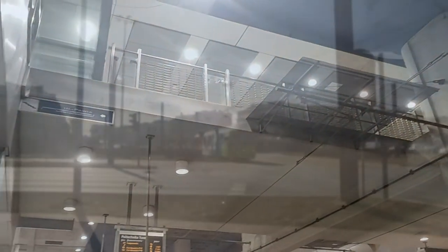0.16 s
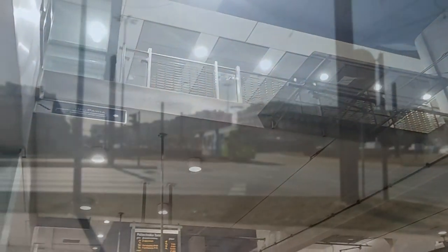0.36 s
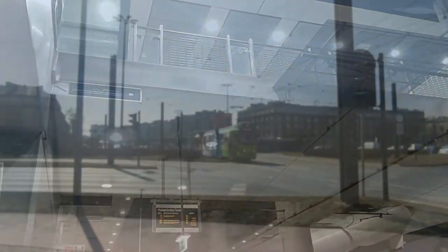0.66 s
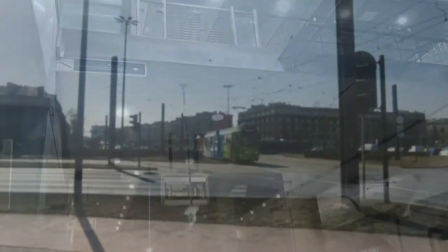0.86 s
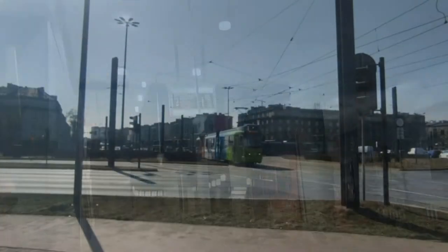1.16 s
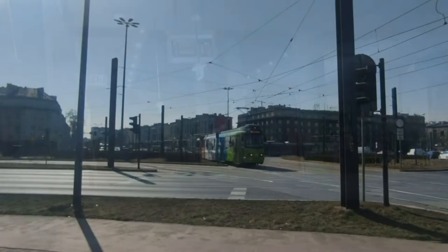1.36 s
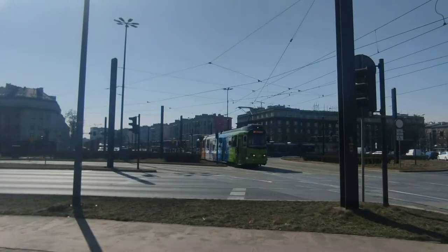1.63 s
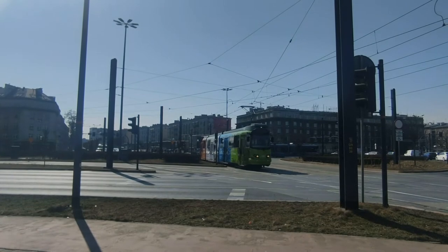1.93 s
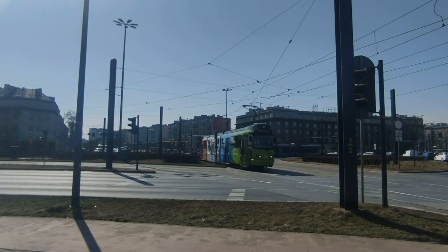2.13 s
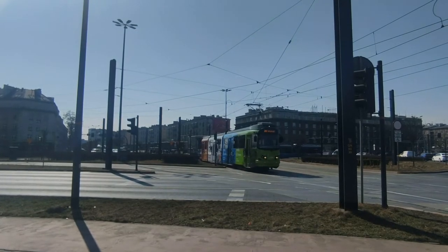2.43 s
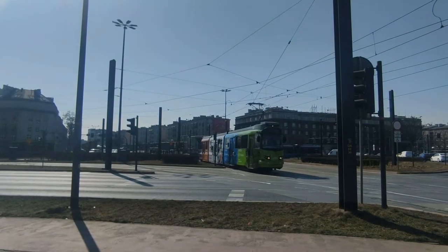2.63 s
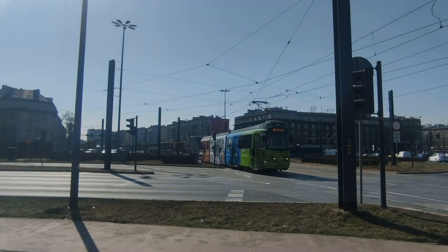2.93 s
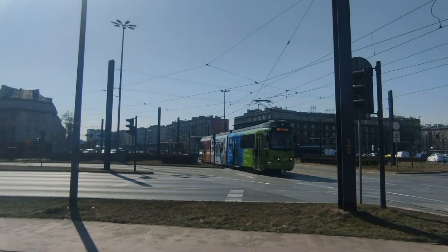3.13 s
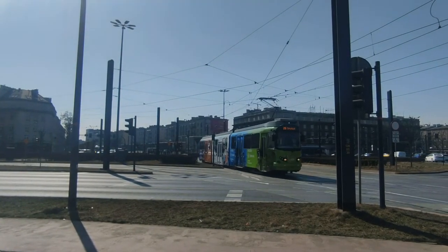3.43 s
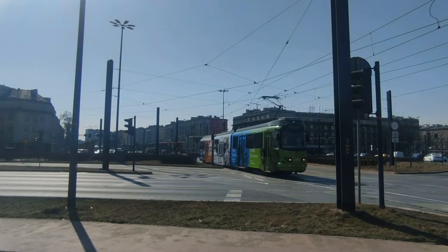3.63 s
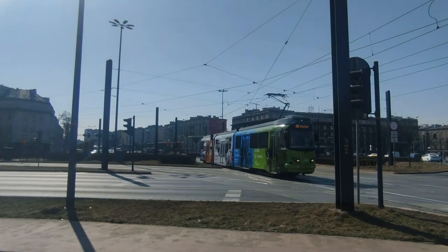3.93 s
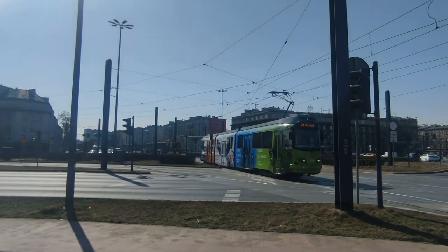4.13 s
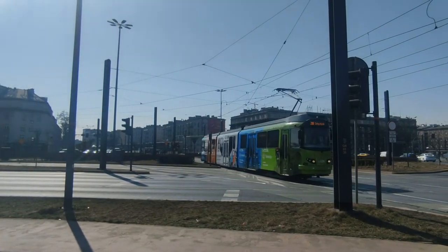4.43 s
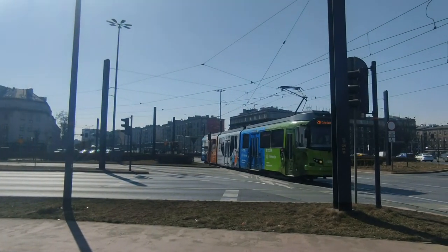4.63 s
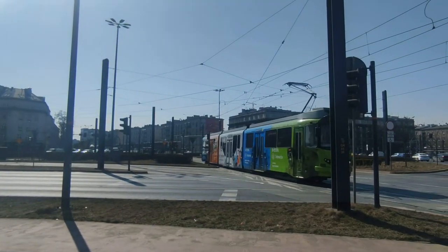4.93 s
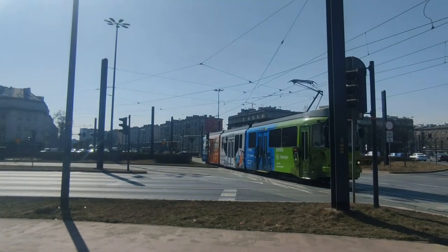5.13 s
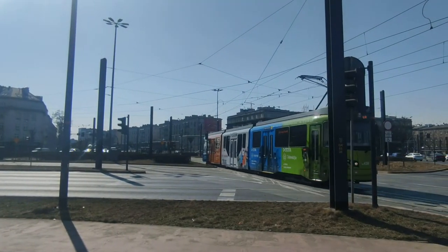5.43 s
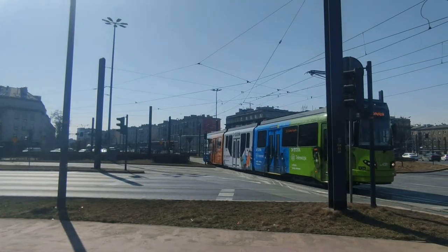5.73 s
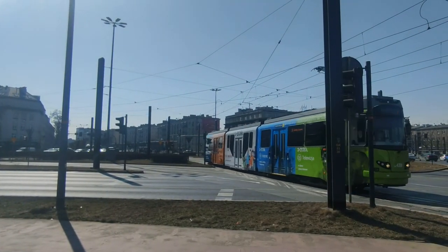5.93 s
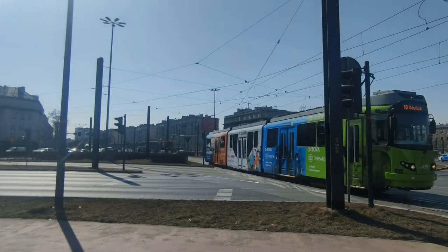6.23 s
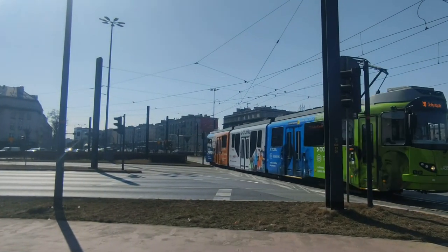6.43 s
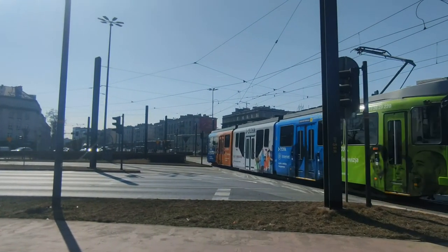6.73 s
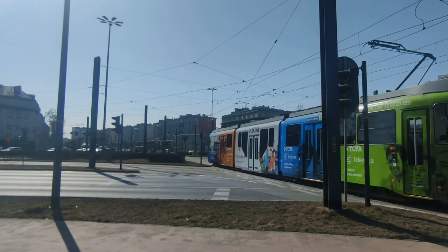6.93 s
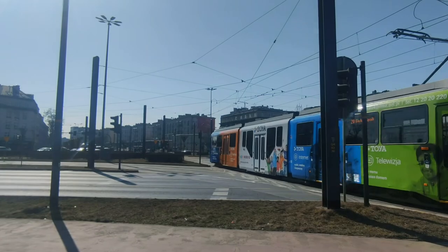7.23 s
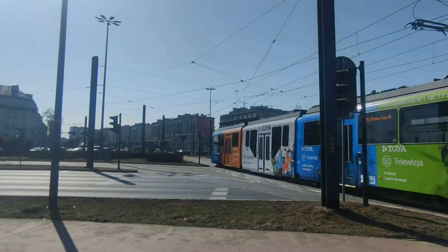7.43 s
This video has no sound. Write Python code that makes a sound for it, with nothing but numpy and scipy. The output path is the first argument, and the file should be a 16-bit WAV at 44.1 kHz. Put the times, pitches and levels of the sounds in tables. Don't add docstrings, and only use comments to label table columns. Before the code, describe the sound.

A booming station hall roar with dull knocks fades into a street tram approaching, rumbling, clattering over rail joints, ending with a close metallic bang.

```python
import sys
import numpy as np
from scipy import signal
from scipy.fft import rfft, irfft
from scipy.io import wavfile
from scipy.ndimage import uniform_filter1d

SR = 44100
rng = np.random.default_rng(int(sys.argv[2]) if len(sys.argv) > 2 else 0)


def dump_mix(stems):
    frames = np.atleast_2d(stems).T
    limited = np.clip(frames, -1, 1)
    pcm = np.round(limited * 32767).astype(np.int16)
    wavfile.write(sys.argv[1], SR, pcm)


def magnitude_from_level(level_db):
    exponent = np.asarray(level_db, float) / 20
    return 10 ** exponent


N = 334278


def evened(x):
    return x / np.sqrt(np.mean(x ** 2) + 1e-20)


def along(rows, t):
    s, *columns = np.transpose(rows)
    return [np.interp(t, s, c) for c in columns]


def add(mix, s, sound):
    part = mix[round(s * SR):][:len(sound)]
    part += sound[:len(part)]


def drift(size):
    smooth = uniform_filter1d(rng.standard_normal(N), size=size)
    return evened(uniform_filter1d(smooth, size=size))


def resonate(x, hz, width_hz):
    r = np.exp(-np.pi * width_hz / SR)
    if np.ndim(hz) == 0:
        pole = r * np.exp(2j * np.pi * hz / SR)
        return 2 * signal.lfilter([(1 - r) ** 2], [1, -2 * pole, pole * pole], x + 0j).real
    turn = np.exp(2j * np.pi * np.cumsum(hz) / SR)
    return 2 * (turn * signal.lfilter([(1 - r) ** 2], [1, -2 * r, r * r], x / turn)).real


def body(x, modes):
    return evened(sum((-1) ** k * magnitude_from_level(db) * resonate(x, hz, width)
                      for k, (hz, width, db) in enumerate(modes)))


def noise(colour, patchy_db, flicker_db, low_hz=1., high_hz=1e5, count=N):
    frames = count // 256 + 5
    real, imag, patches = rng.standard_normal((frames, 513, 3)).T
    patches = uniform_filter1d(patches, size=9, axis=1)
    patches = evened(uniform_filter1d(patches, size=6, axis=0))
    flicker = evened(uniform_filter1d(rng.standard_normal(frames), size=6))
    spectra = (real + 1j * imag) * magnitude_from_level(patchy_db * patches + flicker_db * flicker)
    x = signal.istft(spectra, nperseg=1024, noverlap=768)[1]
    hz = np.fft.rfftfreq(len(x), 1 / SR) + 1
    f, db = np.transpose(colour)
    tint = magnitude_from_level(np.interp(np.log(hz), np.log(f), db))
    band = 1 / np.sqrt((1 + (low_hz / hz) ** 8) * (1 + (hz / high_hz) ** 8))
    return evened(irfft(rfft(x) * tint * band, len(x))[:count])


def strike(rows, gain_db, t60):
    out, t = np.zeros(N), np.arange(round(SR / 5)) / SR
    for (s, db, hz), (a, b) in zip(rows, rng.random((len(rows), 2))):
        pair = np.sin(2 * np.pi * (hz * t + a)) + .7 * np.sin(2 * np.pi * (hz * 1.06 * t + b))
        add(out, s, magnitude_from_level(db + gain_db - 60 * t / t60) * (1 - np.exp(-t / 0.0018)) * pair)
    return out


# f/Hz, level/dB per Hz
HALL_COLOUR = [(12, -72), (20, -44), (53, -29), (81, -7), (260, -3.5), (407, -8.5), (563, -22), (778, -19),
               (1310, -43), (1770, -48.5), (4340, -68), (6310, -68), (7700, -79), (10000, -107),
               (16900, -120)]
# f/Hz, width/Hz, level/dB over the roar
HALL_MODES = [
    (89.2, 12, -7),
    (125, 14, -9),
    (153, 9.6, -8.5),
]
# f/Hz, width/Hz, level/dB
HALL_CLANK = [
    (754, 82, 3.5),
    (1020, 170, 0),
    (1300, 240, -4),
    (1650, 360, -17),
]


def hall(t):
    t = t[:2 * SR]
    fade = np.clip((1.6 - t) / 0.33, 0, 1)
    level_db = -19 - 9.5 * t - 31 * np.maximum(t - 1.01, 0)
    booms = sum(magnitude_from_level(db) * evened(resonate(rng.standard_normal(len(t)), hz, width))
                for hz, width, db in HALL_MODES)
    clank_db = -42.5 - 50 * np.maximum(t - 0.22, 0)
    clank = magnitude_from_level(clank_db) * body(rng.standard_normal(len(t)), HALL_CLANK)
    roar = noise(HALL_COLOUR, 0.9, 0.42, count=len(t)) + booms * np.clip((1.1 - t) / .5, 0, 1)
    return np.pad(clank + fade * magnitude_from_level(level_db) * roar, (0, N - len(t)))


# t/s, nearness level/dB, wheel scrub level/dB (flanges rub hardest on the
# bend), rail roar level/dB
TRAM = [(0.0, 6, -9, 0.5), (.35, -0.5, -10.5, 0), (.65, -0.5, -12.5, -1), (1.2, -3, -6.5, -1.5),
        (1.8, -6, -2.5, -0.5), (2.4, -5.5, -1.5, 0), (3.0, -4, 2, -1), (3.3, -3.5, 2, -0.5),
        (3.7, -3, 1.5, -0.5), (4.1, -1, -1.5, 0), (4.65, 1, -2, -0.5), (5.0, 1, -2, 0), (5.4, 2, -3, 0.5),
        (6.0, 1, -1, 0), (6.4, 2, -3.5, 0), (7.0, 2.5, -3.5, -0.5), (7.35, 4, -1.5, 0), (7.58, 8.5, -7, -1)]
# f/Hz, level/dB per Hz
ROLL_COLOUR = [(20, -43.5), (46, -6.5), (81, 3.5), (143, -7), (184, -6.5), (318, -10.5), (497, -19),
               (741, -16), (950, -21.5), (1150, -30.5), (1420, -24.5), (2050, -24.5), (2850, -36),
               (3600, -40), (4300, -45), (4850, -51), (5400, -46.5), (6150, -43.5), (7700, -47.5),
               (10000, -78)]
ROLL_EDGES = (128.4, 449, 1113, 2550)
# level/dB, share of nearness, of scrub, of rail roar [dB per dB]
ROLL_PARTS = [
    (-31, 0.93, 0.29, 0),
    (-29.5, 0.57, 0.054, 0),
    (-36.5, 0.98, 1.03, 0.99),
    (-41.5, 0.044, 1.09, 0),
    (-49.5, 0.11, 0.96, 0.32),
]


def rolling(t):
    edges = (1., *ROLL_EDGES, 1e5)
    unrest_db = ((1.4, 0.58), (1.25, 0.83), (1.6, 0.85), (1.2, 0.76), (1.7, 1.0))
    near_db, scrub_db, rail_db = along(TRAM, t)
    out = np.zeros(N)
    for k, (db, near, scrub, rail) in enumerate(ROLL_PARTS):
        level = magnitude_from_level(db + near * near_db + scrub * scrub_db + rail * rail_db)
        out += level * noise(ROLL_COLOUR, *unrest_db[k], edges[k], edges[k + 1])
    return out


def axle(t):
    db = -38.5 + 0.99 * along(TRAM, t)[0]
    return magnitude_from_level(db) * evened(resonate(rng.standard_normal(N), 86 + 2.3 * drift(size=6000), 33))


def ground(t):
    db = -38.5 + 1.2 * along(TRAM, t)[0]
    return magnitude_from_level(db) * evened(resonate(rng.standard_normal(N), 66, 30))


# t/s, peak level/dB, f/Hz
HALL_KNOCKS = [
    (0.357, -26, 647),
    (0.394, -24, 520),
    (0.644, -24, 511),
    (0.715, -27, 541),
    (0.794, -30, 697),
    (0.876, -21.5, 630),
    (1.242, -33.5, 686),
]


def hall_knocks():
    return strike(HALL_KNOCKS, -5, 0.052)


# t/s, peak level/dB, f/Hz, t60/s
THUMPS = [(1.407, -9.5, 84, 0.086), (1.539, -31, 78, 0.12), (2.67, -20, 84, 0.12), (4.23, -2, 83, 0.11),
          (4.928, -6, 92, 0.15), (6.349, -14, 99, 0.18), (6.456, -4, 80.7, 0.13),
          (6.512, -1.5, 71.6, 0.095), (6.997, -26, 165, 0.12), (1.04, -11, 129, 0.12),
          (1.27, -12.5, 120, 0.11), (1.73, -18, 63, .15), (2.6, -16, 66, 0.19), (6.391, -12, 63, 0.24),
          (6.92, -18, 66, 0.16), (7.552, -6, 90, 0.16), (1.309, -18, 60, .12), (4.93, -21, 283, 0.24),
          (5.03, -21, 270, .2), (7.09, -21, 292, .2), (3.49, -21.5, 245, .25), (2.66, -24, 305, 0.18),
          (0.52, -16.5, 262, 0.21)]


def thumps():
    out, t = np.zeros(N), np.arange(round(SR / 2)) / SR
    for s, db, hz, t60 in THUMPS:
        add(out, s, magnitude_from_level(db - 60 * t / t60) * (1 - np.exp(-t / 0.016)) * np.sin(2 * np.pi * hz * t))
    return out


# t/s, strength level/dB, then rail ring, bogie thud, tinny rattle level/dB over it
CLATTER = [(1.501, -27, 2.5, 9.5, -18), (2.075, -27, 4.5, 0, -12.5), (2.117, -23, 1, 5.5, -36),
           (2.594, -22, 3.5, 0, -16), (2.663, -22.5, 0.5, 2.5, -16), (2.734, -28, -9, -10, -17),
           (3.443, -22, 1.5, 1, -15), (3.485, -20.5, -1, -0.5, -17), (3.677, -25.5, -20, -8.5, -18),
           (3.988, -35, -7, 17, -8.5), (4.129, -23, 3.5, 6, -13), (4.236, -25.5, -7, 0.5, -14.5),
           (4.456, -35.5, 3, -6, -6), (4.539, -28.5, -3, -4, -18), (4.674, -24.5, 3, 6, -14.5),
           (5.221, -41, 13, 0, -1), (5.474, -26, 4.5, -11, -17), (5.72, -34, -2, -6, -15),
           (5.9124, -34.5, 8, 9, -4.5), (6.033, -24, -4, 7.5, -20), (6.082, -36, 13, 0, -22),
           (6.459, -29.5, 4, 12.5, -8.5), (7.49, -29.5, -1, -2, -10), (7.405, -26.5, 1, 4.5, -15),
           (7.434, -24.5, 0, 4, -15)]
# f/Hz, width/Hz, level/dB
WHEEL = [(1350, 750, -3), (1738, 200, -4), (1924, 200, 1.5), (2220, 270, -2), (2506, 430, -4),
         (3210, 960, -15.5)]
RAIL = [(728, 183, 0), (880, 390, -14.5)]
BOGIE = [(302, 174, 0)]
TIN = [(6086, 390, -3), (6830, 980, -5), (5360, 600, -6.5), (4040, 1100, -10)]


def clatter():
    knocks = rng.standard_normal((4, N))
    hits = rng.random((N)) < 1200 / SR
    knocks *= 0.67 + magnitude_from_level(3.2 * np.minimum(rng.exponential(1, N), 3)) * hits * 1.1
    power = np.zeros((4, N))
    t = np.arange(round(SR / 2)) / SR
    shape = (1 - np.exp(-t / .008)) * np.exp(-np.maximum(t - 0.041, 0) / 0.054)
    for s, db, rail_db, thud_db, tin_db in CLATTER:
        for part, part_db in zip(power, (0, rail_db, thud_db, tin_db)):
            add(part, s, (magnitude_from_level(db + part_db - 12.5) * shape) ** 2)
    return sum(np.sqrt(p) * body(k, modes)
               for p, k, modes in zip(power, knocks, (WHEEL, RAIL, BOGIE, TIN)))


# t/s, peak level/dB, wheel f/Hz
BLOWS = [(1.501, -26, 1710), (1.524, -26, 1946), (1.5524, -24, 1940), (2.0976, -25.5, 2160),
         (2.1151, -21, 1990), (2.1355, -24, 1870), (2.1565, -25, 1860), (2.603, -26, 2030),
         (2.6683, -26, 1920), (3.0081, -31, 1550), (3.028, -30, 2180), (3.2612, -28, 1790),
         (3.4401, -30, 2010), (3.464, -27, 1600), (3.487, -18.5, 1990), (3.6825, -25, 2310),
         (3.8352, -27, 2210), (4.1265, -26, 2030), (4.141, -22.5, 2090), (4.2233, -27, 2190),
         (4.2513, -26, 1980), (4.6573, -25, 1880), (4.6909, -19.5, 1660), (4.8234, -32, 1550),
         (5.0978, -30, 2060), (5.468, -31, 1790), (6.0352, -22, 1950), (6.096, -24.5, 2440),
         (7.3801, -22.5, 2220), (7.4589, -27, 2200), (7.4899, -23, 2180)]


def wheel_blows():
    return strike(BLOWS, -7.5, 0.067)


# t/s, peak level/dB, rail f/Hz
RAIL_KNOCKS = [(1.522, -28, 790), (2.098, -28, 746), (2.128, -27, 700), (2.209, -31, 738),
               (2.607, -23, 740), (2.648, -25, 660), (3.354, -27, 738), (3.479, -24, 730),
               (4.132, -28, 705), (4.147, -25, 807), (4.216, -23, 802), (4.698, -25, 732),
               (4.936, -29, 770), (5.231, -29, 764), (5.4, -29, 689), (5.489, -29, 748), (5.538, -20, 790),
               (5.61, -26, 755), (5.976, -25, 643), (6.042, -27, 778), (6.099, -28, 811), (6.123, -23, 681),
               (6.438, -28, 660), (6.74, -28, 773), (6.902, -27, 625), (6.954, -31, 810), (7.323, -27, 651),
               (7.561, -26, 797)]


def rail_knocks():
    return strike(RAIL_KNOCKS, -6, .07)


# f/Hz, width/Hz, level/dB
BRACKET = [(3280, 620, -0.5), (2870, 230, -4.5), (3540, 93, -6.5)]
# t/s, peak level/dB, bracket ring level/dB, wheel ring level/dB
TICKS = [(2.1141, -30, -14, 5), (2.1869, -33, -5, 11), (2.6194, -28, -4, -1), (2.6633, -28, 1, 1),
         (3.0984, -32, -14, -4), (3.2281, -37, -10, -4), (3.455, -27, -4, -1), (3.5912, -31, -11, 1),
         (3.7883, -38, -12, -1), (3.9749, -36.5, 4, 12), (4.143, -23.5, -1, 5), (4.4543, -32, -1, -1),
         (4.6614, -31.5, 3, 14), (4.694, -26.5, 5, -4), (5.1013, -31.5, 1, 6), (5.2116, -33, -4, -7),
         (6.7878, -37, 3, -8), (5.5694, -36.5, -1, -8), (5.8112, -29.5, -6, -13), (5.9194, -35.5, 8, -5),
         (6.095, -34, -4, -1), (6.2482, -35, -10, -5), (6.4507, -30.5, -8, -8), (6.9274, -33.5, -15, -13),
         (7.0549, -34, -14, -5), (7.1581, -35, 2.5, -3), (7.2878, -35, -7, 9.5), (7.3761, -31, -2, 11),
         (7.4495, -28.5, 4, 4)]
BUZZ = [
    (6.458, -46, 11, -12),
    (6.478, -46, 12, -12),
]
SNAPS = [(1.526, -37, 0, 4), (2.6106, -31, -3, 0), (2.8904, -38, -6, -4), (3.0805, -34, -6, -4),
         (3.3813, -38, -6, -3), (3.4397, -31, -4, -2), (3.4921, -29, -3, 0), (3.6971, -38, -4, 0),
         (3.731, -33, -6, -4), (3.8682, -35, -6, -4), (4.1032, -38, -6, -4), (4.1266, -33, -3, 0),
         (4.2598, -32, -4, -2), (4.5527, -37, -6, -4), (5.1698, -38, -6, -4), (5.3219, -38, -6, -4),
         (5.345, -39, 10, 0), (5.4691, -36, -3, 0), (5.7814, -38, -6, -4), (6.0353, -33, 0, 2),
         (6.4918, -27.5, -8, -8), (6.6313, -27, -0.5, -14), (6.836, -39, -6, -4), (7.0365, -33, -8, -6),
         (7.2081, -37, -6, -4), (7.4925, -33, -5, 0)]


def ticks():
    power, t = np.zeros((3, N)), np.arange(round(SR / 4)) / SR
    start = 1.5
    faint = [(start + u * (N / SR - start), -45 + 5 * (2 * v - 1), -3, 4) for u, v in rng.random((5, 2))]
    for rows, t60 in (([*TICKS, *faint], .085), (BUZZ, 0.31), (SNAPS, .04)):
        shape = (1 - np.exp(-t / 0.0024)) * (magnitude_from_level(-60 * t / 0.0066) + 0.79 * magnitude_from_level(-60 * t / t60))
        for s, db, bracket_db, wheel_db in rows:
            for part, part_db in zip(power, (0, bracket_db, wheel_db + 0.5)):
                add(part, s, (magnitude_from_level(db + part_db - 11) * shape) ** 2)
    drive = rng.standard_normal((3, N))
    return sum(np.sqrt(p) * body(k, modes) for p, k, modes in zip(power, drive, (TIN, BRACKET, WHEEL)))


# t/s, f/Hz, level/dB
MOTOR = [(2.5, 127, -41), (3.0, 135, -38), (3.3, 141, -37), (3.7, 150, -34), (3.95, 155, -31.5),
         (4.4, 165, -31), (4.8, 174.5, -30), (5.15, 182, -33.5), (5.7, 192, -33.5), (6.1, 199, -38),
         (6.55, 206, -33), (6.8, 211, -41), (7.1, 217, -32), (7.58, 226, -37)]
# multiple of the hum, level/dB over it, from t/s, to t/s
GEARS = [
    (.5, -1, 5.1, 7.58),
    (.62, -3.5, 5, 7.04),
    (1.5, -1.5, 5.25, 5.68),
    (1.5, -3.5, 5.75, 6.55),
    (1.5, -8.5, 6.7, 7.9),
]


def motor(t):
    hz, db = along(MOTOR, t)
    turns = np.cumsum(hz + 0.31 * drift(size=3000)) / SR
    out = np.zeros(N)
    for order, order_db, start, end in [(1, 0, MOTOR[0][0], 8), *GEARS]:
        waver_db = 1 if order == 1 else 3
        level = magnitude_from_level(db + order_db + waver_db * drift(size=3000))
        level = level * np.clip(np.minimum(t - start, end - t) / 0.12, 0, 1)
        out += np.sqrt(2) * np.sin(2 * np.pi * order * turns) * level
    return out


# t/s, peak level/dB, f/Hz
STRUT = [
    (6.478, -44, 3400),
    (6.5, -45, 3420),
]


def strut():
    return strike(STRUT, 0, 0.14)


# f/Hz, width/Hz, level/dB
BANG = [(219, 81, 4.5), (292, 51, 4.5), (430, 47, -0.5), (541, 65, -8), (739, 69, -2), (895, 93, -1.5),
        (1280, 380, -25), (2270, 490, -20)]
# f/Hz, level/dB, t60/s
FRAME = [
    (243, -2, 0.5),
    (314, -6, 0.11),
    (420, 0, 0.14),
    (517, -13, 0.17),
]
# t/s, peak level/dB, f/Hz
BANG_BLOWS = [
    (7.3765, -17, 880),
    (7.380, -12, 720),
    (7.384, -14, 690),
    (7.3855, -18, 900),
    (7.378, -26, 2300),
]


def bang():
    out, t = strike(BANG_BLOWS, 0, .045), np.arange(round(SR / 2)) / SR
    shape = np.exp(-np.maximum(t - .015, 0) / 0.0088) + 0.77 * np.exp(-t / 0.071)
    drive = rng.standard_normal(len(t))
    crash = sum(magnitude_from_level(db) * np.sqrt(width) * evened(shape * resonate(drive, hz, width))
                for hz, width, db in BANG)
    crash = evened(crash) * np.sqrt(np.mean(shape ** 2))
    frame = sum(magnitude_from_level(db - 60 * t / t60) * np.sin(2 * np.pi * (hz * t + rng.random()))
                for hz, db, t60 in FRAME)
    frame = frame * (1 - np.exp(-t / 0.0057))
    add(out, 7.373, magnitude_from_level(-19) * (crash + frame) * (1 - np.exp(-t / 0.004)))
    return out


def scene():
    t = np.arange(N) / SR
    drones = (axle(t) + ground(t)) * np.minimum(t / .6, 1)
    station = hall(t) + hall_knocks()
    tram = rolling(t) + drones + motor(t) + thumps() + bang()
    joints = clatter() + wheel_blows() + rail_knocks() + ticks() + strut()
    return (station + tram + joints)[None]


# t/s, level/dB, lost up to f/Hz
DROPOUTS = [(.435, -26, 7700), (.889, -45, 6000), (1.392, -30, 7200), (1.503, -14, 6000),
            (1.738, -20, 6000), (2.318, -13, 6500), (2.642, -12, 5000), (2.876, -14, 7200),
            (2.97, -12, 7200), (3.828, -17, 7000), (4.408, -17, 6800), (4.57, -19, 6500),
            (5.197, -14, 6000), (5.545, -18, 6000), (6.728, -14, 7500), (7.252, -45, 6000),
            (7.496, -18, 6000), (7.541, -22, 6000)]
# from f/Hz, level/dB, frame-to-frame jitter level/dB
TREBLE_STEPS = [
    (3676, -3.5, 2.5),
    (4430, -2, 0.5),
    (5120, -2.5, 2),
    (5810, 3, 0),
    (6450, 2, 2.),
    (7254, 8, 1),
    (8000, 0, 0),
]


def top_cut(x):
    return signal.sosfilt(signal.butter(12, 8520, fs=SR, output="sos"), x)


def record(dry):
    x = signal.lfilter(*signal.butter(2, 42, "high", fs=SR), dry)
    hz, t, z = signal.stft(x, SR, nperseg=256, noverlap=192)
    hz = hz[:, None]
    gain_db = 0
    for s, db, top_hz in DROPOUTS:
        deep = db < -35
        moment = np.exp(-((t - s) / (.014 if deep else .0075)) ** 6)
        reach = (hz > 3650) | (hz > 2250) & (rng.random((129, 1)) < .4)
        lost = np.repeat((rng.random(65) > .15) | deep, 2)[:129, None]
        gain_db = gain_db + db * moment * (hz < top_hz) * reach * lost
    frame = (t * SR / 1024).astype(int)
    for (low_hz, db, jitter_db), above in zip(TREBLE_STEPS, TREBLE_STEPS[1:]):
        step_db = db + jitter_db * rng.standard_normal(frame[-1] + 1)[frame]
        gain_db = gain_db + (hz > low_hz) * (hz <= above[0]) * step_db
    x = signal.istft(z * magnitude_from_level(gain_db), SR, nperseg=256, noverlap=192)[1][:, :N]
    band_limit = signal.firwin(2047, 7550, window=("kaiser", 10), fs=SR)
    x = signal.oaconvolve(x, band_limit[None], "same")
    x = x - magnitude_from_level(-23) * np.exp(-np.arange(N) / (.001 * SR))
    x = x * np.clip((N - np.arange(N)) / 90, 0, 1)
    return top_cut(x)


dry = scene()
out = record(dry)
dump_mix(out)
```